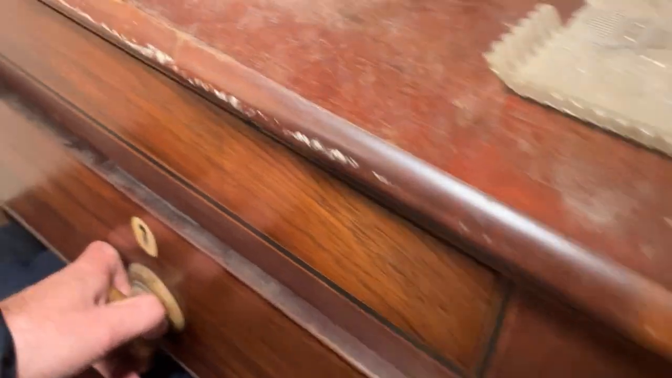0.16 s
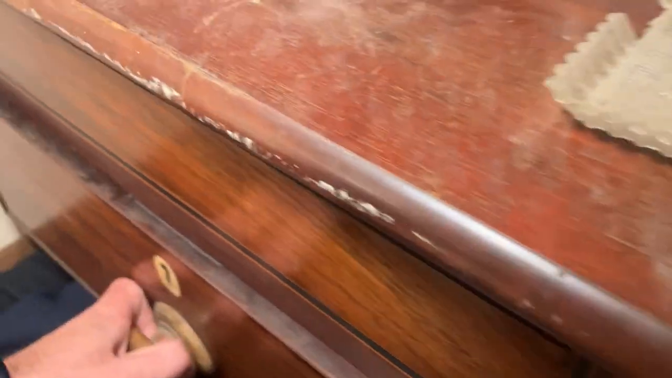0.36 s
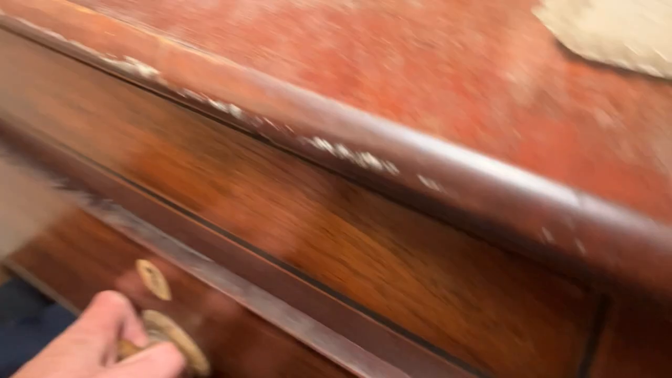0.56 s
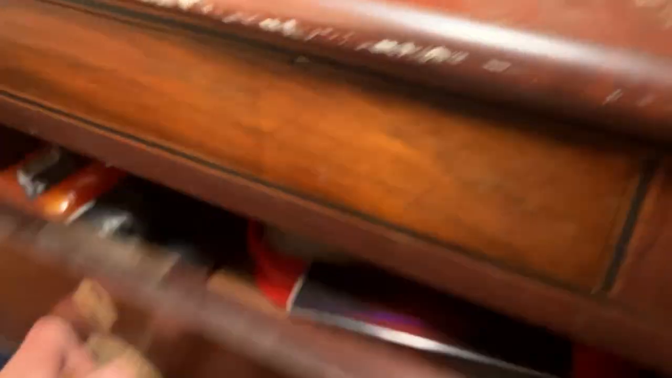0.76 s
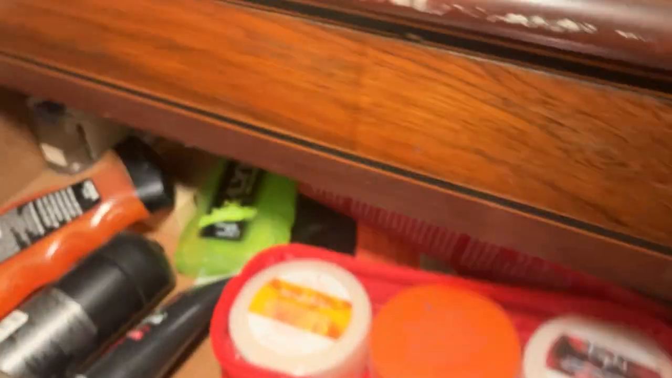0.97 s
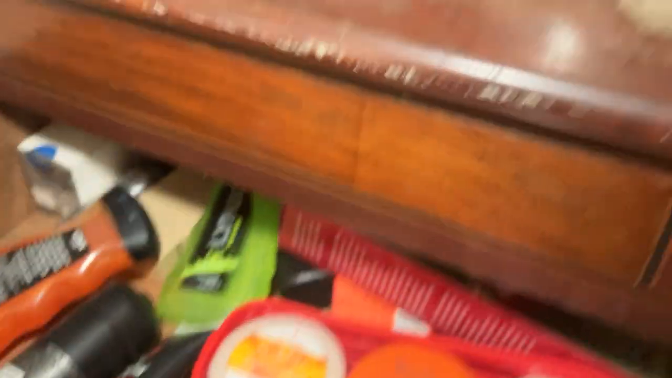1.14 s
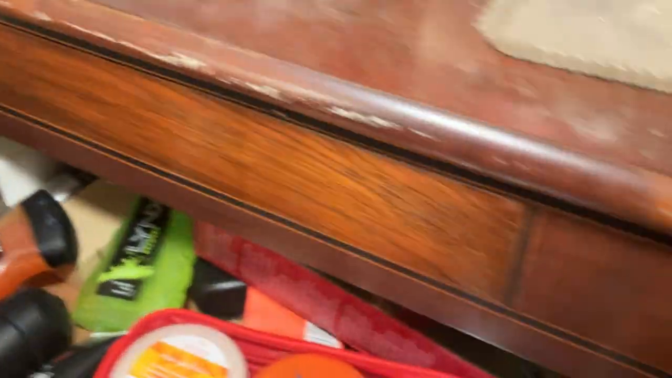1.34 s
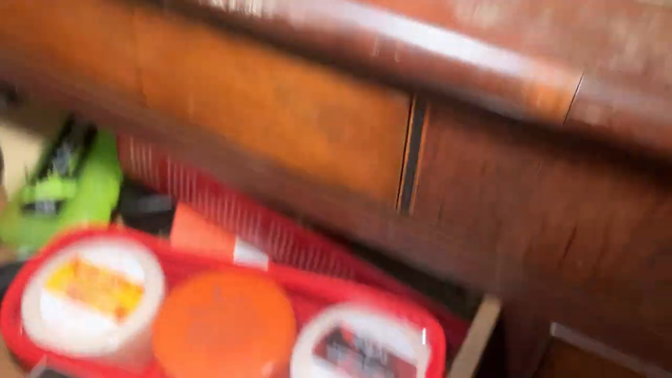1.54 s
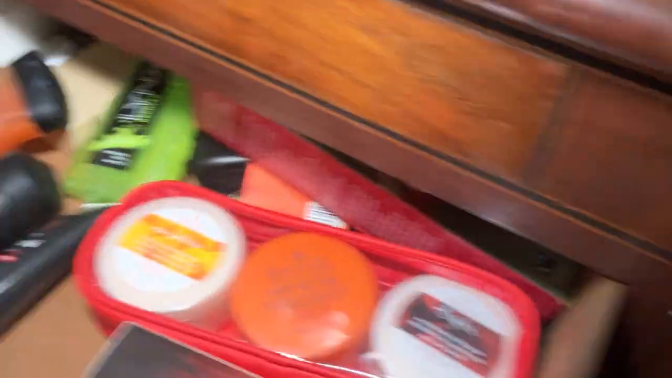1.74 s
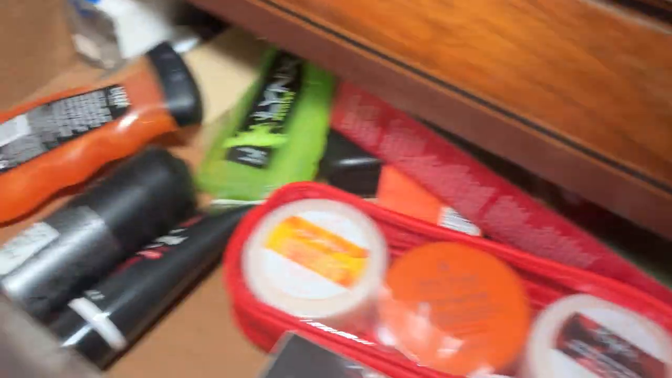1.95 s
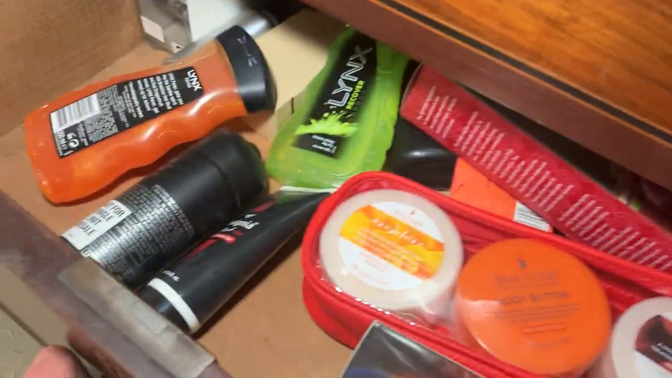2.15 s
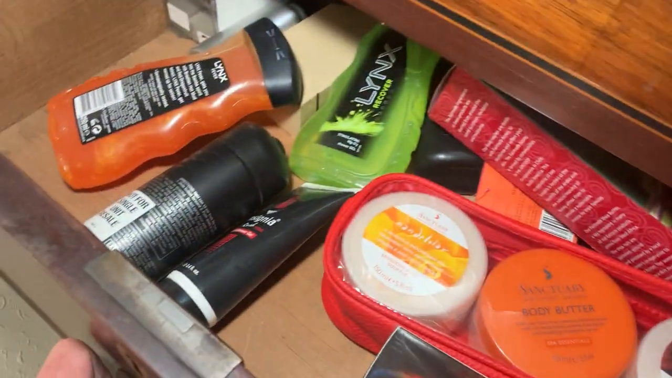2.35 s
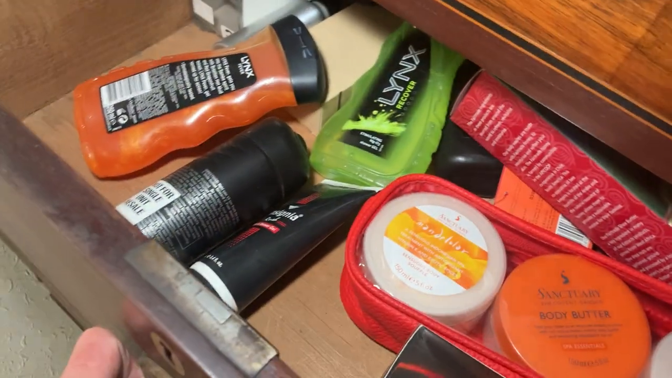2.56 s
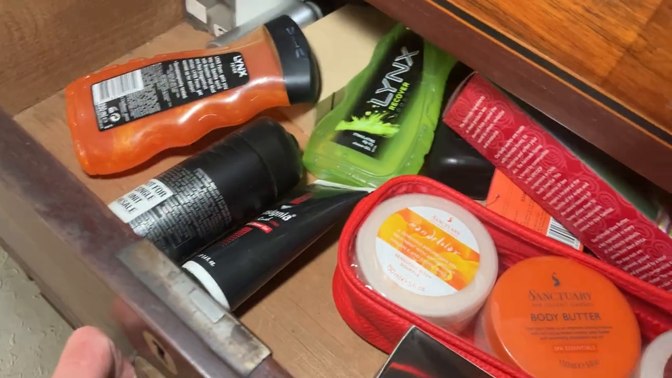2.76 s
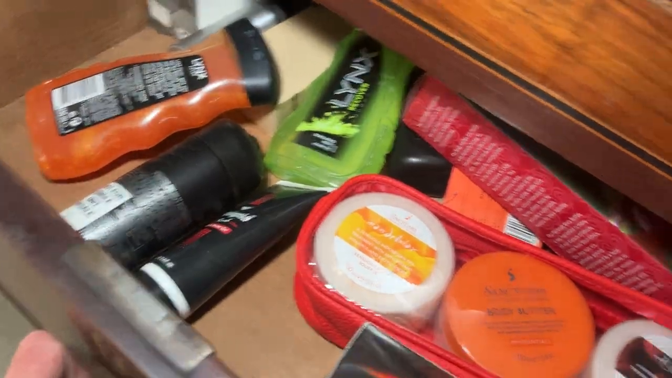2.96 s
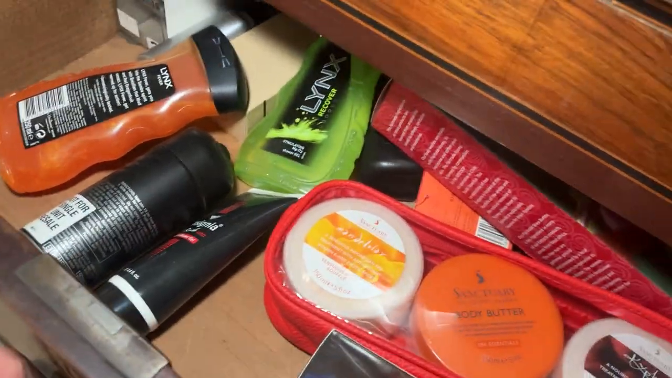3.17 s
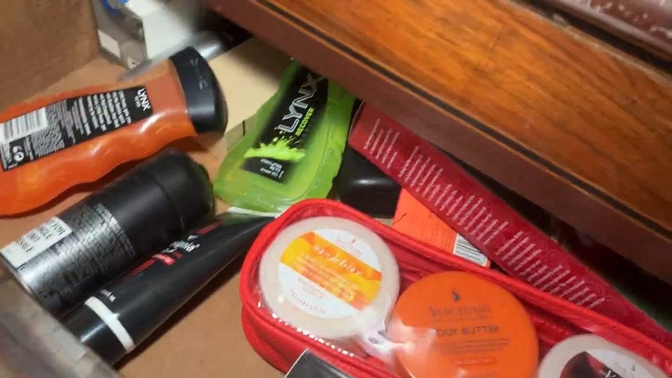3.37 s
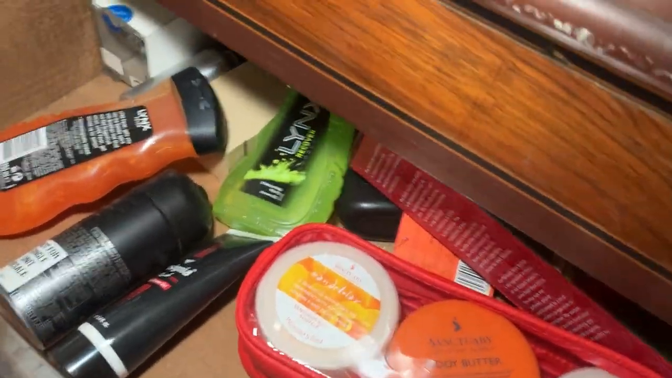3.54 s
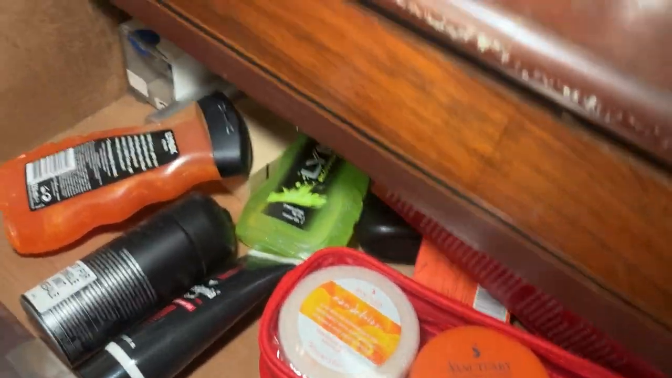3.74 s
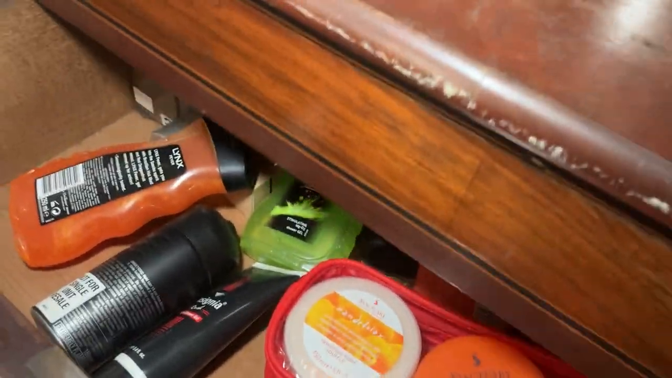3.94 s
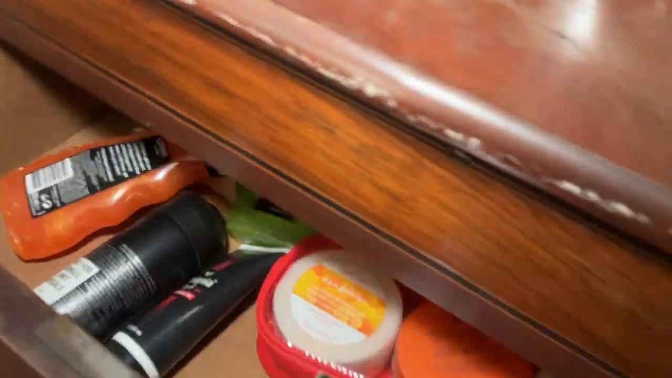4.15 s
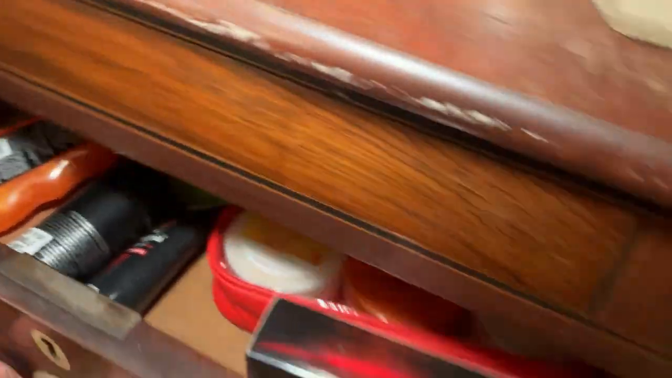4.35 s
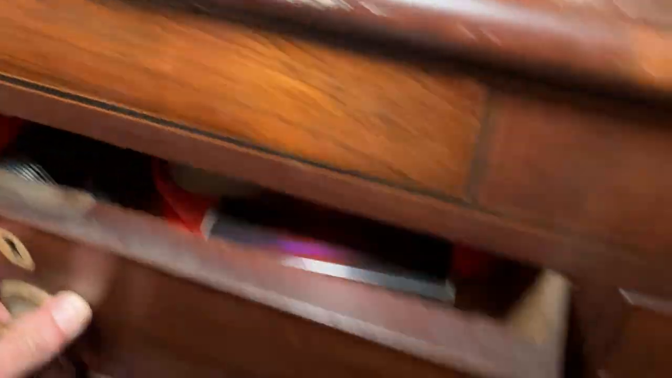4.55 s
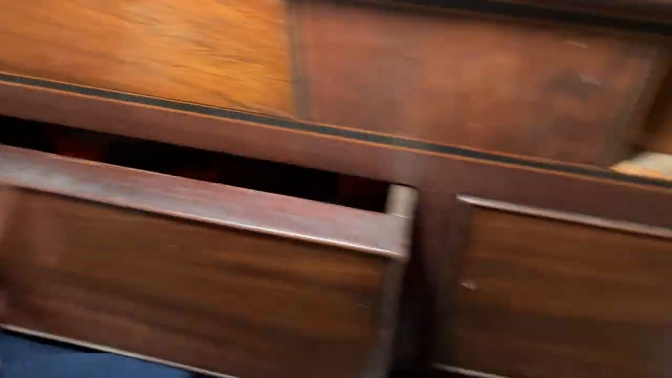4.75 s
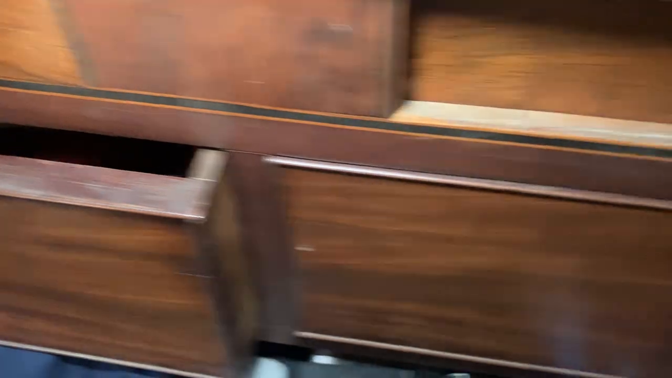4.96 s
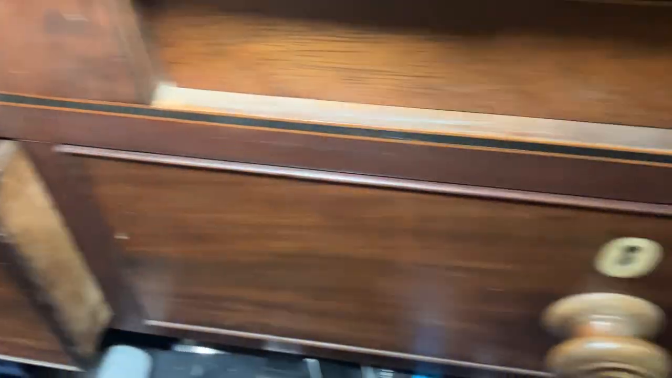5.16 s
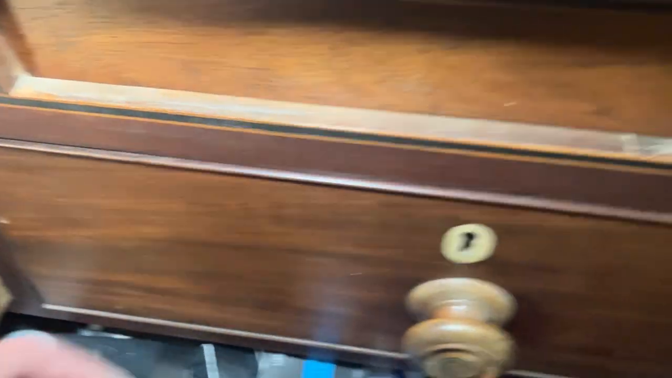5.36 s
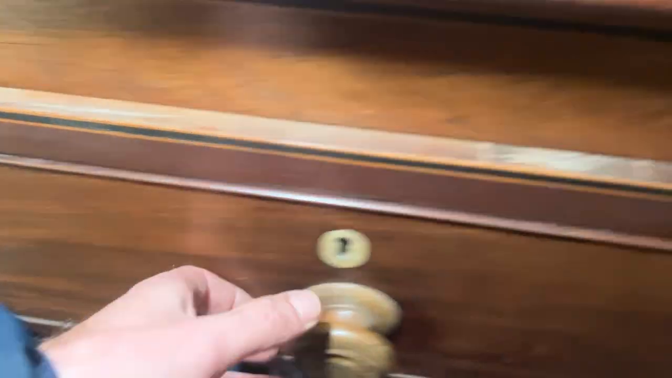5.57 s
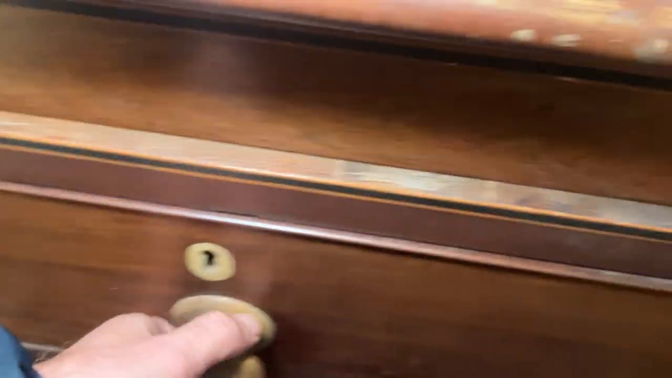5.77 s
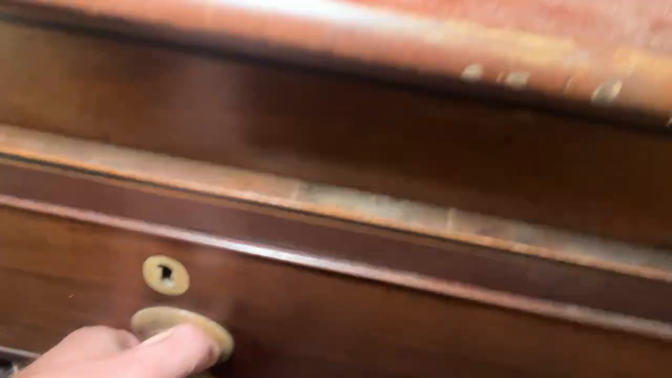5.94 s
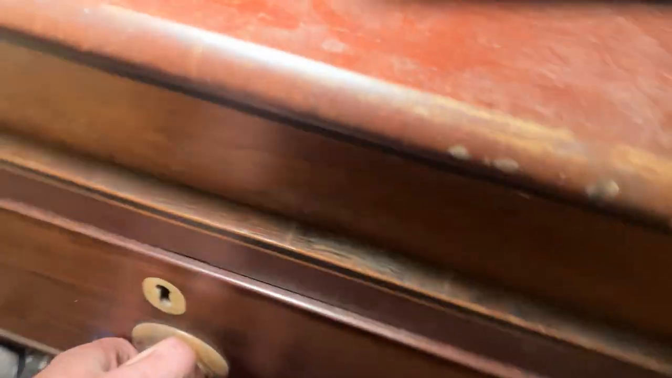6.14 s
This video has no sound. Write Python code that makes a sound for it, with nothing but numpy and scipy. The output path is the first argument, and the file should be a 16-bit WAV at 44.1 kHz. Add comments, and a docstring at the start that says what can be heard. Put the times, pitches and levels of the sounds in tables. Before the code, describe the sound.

Faint taps and skin rubbing, then a sudden dry crack and a dense wooden clatter with low floor shudder as a tight drawer jerks open. A smaller knock ends it. After a hushed pause come light scraping, tiny squeaks, a soft bump and sleeve rustle as it slides partly back, then quiet fumbling at another knob. Short, dull indoor echo, faint room tone, close handheld stereo pickup.

```python
"""A stiff wooden drawer is tugged out of an old chest: it cracks free, jolts along its runners and stops.
Later it is pushed most of the way back and the hand moves on to the next knob; sleeves rustle close by.
Juddering pushes ring the panels, noise bursts make the cracks, tiny slips make the drag and the rustle,
wavering tones squeak and whistle, low noise shudders the floorboards, filtered noise is the quiet room tone.
Feedback delays add the room; a handheld pair of small microphones picks it all up."""
import sys
import numpy as np
from scipy import signal
from scipy.fft import rfft, irfft, next_fast_len
from scipy.io import wavfile

SR = 44100
rng = np.random.default_rng(int(sys.argv[2]) if len(sys.argv) > 2 else 0)


def pcm_store(signal):
    """Save signal as 16-bit PCM."""
    levels = np.round(np.clip(np.atleast_2d(signal), -1, 1) * 32767)
    wavfile.write(sys.argv[1], SR, levels.astype(np.int16).T)


N = 273578

# dull blows and judders in the carcass: start_s, level_db, pitch_hz (of the judder), push_cycles
KNOCKS = [(0.058, -42, 555, 3.7), (0.065, -37, 200, 2.5), (0.083, -36, 205, 4.7), (0.13, -42.5, 144, 3.4),
          (0.423, -43, 150, 2.3), (0.49, -39.5, 237, 1.4), (0.518, -41, 172, 2.4), (0.585, -33.5, 450.4, 3),
          (0.591, -32, 894, 6.6), (0.694, -8.5, 970, 4.2), (0.699, -19, 270, 2.7), (0.705, -7, 810, 5),
          (0.724, -16, 113, 1.3), (0.73, -21, 560, 6), (0.74, -15, 147.7, 1.2), (0.748, -18.5, 610, 4.2),
          (0.769, -7, 139, 1.3), (0.777, -11, 336, 9), (0.768, -6, 674, 1), (0.787, -16, 104, 3.1),
          (0.789, -17, 516, 5.8), (0.808, -8.5, 239, 2), (0.812, -12.5, 359.4, 8), (0.822, -0.5, 160, 2.5),
          (0.836, -11.5, 300, 5), (0.85, -11.5, 188, 2), (0.852, -20, 565, 4), (0.87, -37.5, 106, 1.4),
          (0.917, -13.5, 155, 1.7), (0.925, -13.5, 205, 2), (0.94, -20.5, 153, 6.9), (0.943, -25, 505, 5.1),
          (1.152, -28, 243, 5.2), (1.191, -15.5, 248, 2.4), (1.196, -17, 316, 6), (1.228, -25, 142.7, 1.8),
          (1.966, -43, 156, 1.6), (2.053, -48, 131, 2.9), (2.075, -42, 126, 3.2), (2.1, -37.5, 175, 5.7),
          (2.127, -45.5, 206.5, 6.9), (2.155, -49, 218, 2.2), (2.181, -42.5, 122.4, 5.1),
          (3.058, -47, 200, 0.81), (3.089, -45.5, 100, 2), (3.06, -51.5, 546, 4), (3.206, -52, 875, 4),
          (3.483, -40, 344, 3), (3.491, -42.5, 175, 3), (3.529, -51, 103, 3.3), (3.671, -33.5, 243, 5.2),
          (3.673, -37, 457, 12), (3.718, -45, 567, 9), (3.79, -39, 443, 9), (4.062, -33, 365, 9.8),
          (4.074, -24, 139, 8.2), (4.103, -41, 102, 2), (4.164, -35, 132, 3.1), (4.272, -43, 374, 9),
          (4.33, -45, 374, 9), (4.694, -37.5, 610, 1.6), (4.702, -36, 354, 8.6), (4.705, -30.5, 152, 2.4),
          (4.729, -34.5, 116, 2.4), (4.922, -44.5, 594, 5.9), (4.923, -46.5, 1410, 5.7),
          (5.554, -41.5, 560, 4), (5.557, -39.5, 162, 3.9), (5.58, -40, 172, 7.4), (5.606, -44, 191, 7),
          (5.815, -37.5, 181, 6.6), (5.865, -40.5, 179, 7.6), (5.919, -46.5, 185, 3.6),
          (6.006, -41, 152.3, 3.3), (6.058, -41.5, 228.6, 3.1), (6.114, -41.5, 174, 3.3),
          (6.161, -39.5, 141, 2.8)]
# dry cracks of varnish and knob: start_s, level_db, centre_hz, treble_db (relative), left_minus_right_db, t60_s
CRACKS = [(0.036, -30.5, 2540, -13, 2, 0.029), (0.058, -40.5, 1110, -10, 5, 0.053),
          (0.4, -50, 1690, 26.5, 12, 0.024), (0.421, -46, 830, 10, 0, 0.034),
          (0.488, -46.5, 900, -2, -1, .02), (0.585, -32.5, 940, -12, -3, 0.061),
          (0.596, -34, 820, -9, 1, 0.051), (0.615, -34.5, 1500, 30.5, -4, 0.015),
          (0.639, -23, 2830, 26, 2, 0.019), (0.693, -3.5, 2400, 17.5, -2, 0.024),
          (0.702, -4.5, 2200, 20, 0.5, 0.025), (0.711, -17, 1600, 7, 0, 0.041),
          (0.744, -21, 1400, -4.5, -5, .05), (0.757, -12, 1200, -5, -3, 0.071),
          (0.765, -15, 2822, 10, -2.5, 0.072), (0.784, -25, 1400, -5, -3, 0.063),
          (0.812, -14.5, 1499, 16, 3, .04), (0.821, -20, 1703, 3, -6, 0.035),
          (0.835, -24, 1000, 5, -1, .04), (0.849, -30, 1006, 0, -3, 0.044),
          (0.861, -29, 1600, 5, -3, 0.046), (0.905, -29, 1100, 2, -7, 0.049),
          (0.922, -31, 1200, 12, -6, .04), (0.946, -37.5, 1810, 0, -3, 0.031),
          (2.302, -51.5, 758, 6, -1.5, 0.033), (3.053, -48.5, 1500, 6, 0, 0.12),
          (3.203, -46.5, 1980, 3, 1, .05), (4.064, -37, 1200, 5, -2, 0.069), (4.16, -42, 2000, 0, -7, .08),
          (4.435, -39.5, 2200, 8, -5, 0.055), (4.52, -48, 1800, 0, -3, 0.046),
          (4.689, -40.5, 1600, -15, -3, 0.061), (4.696, -38.5, 1400, -16, -3, 0.044),
          (4.921, -43, 1420, 24, -4, 0.03), (5.552, -40, 1200, 20, 11, .025),
          (6.055, -53, 900, -2.5, 1, 0.043), (6.084, -48, 1510, 28.5, 2.5, .012)]
# drag of drawer and hand on the wood: time_s, thin_panels_db, big_panels_db, small_panels_db
DRAG = [(0.0, -55.5, -44, -59), (0.14, -62, -61, -61), (0.33, -66, -58, -68), (0.42, -61, -79, -61),
        (0.56, -66, -54, -67.5), (0.6, -49, -55, -63), (0.68, -52.5, -49, -59), (0.71, -26, -23.5, -42.5),
        (0.75, -23, -24, -33.5), (0.79, -27.5, -15.5, -29.5), (0.825, -23, -23, -23.5),
        (0.87, -36.5, -44, -29.5), (0.9, -38.5, -25, -31.5), (0.93, -37, -38.5, -31.5),
        (0.98, -41.5, -38, -37.5), (1.06, -50.5, -47, -49), (1.15, -50, -52, -65), (1.21, -44, -42, -61),
        (1.3, -78, -43.5, -66), (1.5, -69, -81.5, -73.5), (1.86, -73, -69, -68), (1.96, -62, -57.5, -62),
        (2.1, -62.5, -48, -64), (2.2, -65, -54, -68), (2.28, -71, -76.5, -80), (2.65, -72, -64, -71.5),
        (3.0, -69, -78, -78), (3.08, -81, -70, -61), (3.35, -67.5, -82, -79), (3.52, -54, -61, -56.5),
        (3.64, -60, -60, -66), (3.7, -51.5, -53, -47.5), (3.79, -51, -47, -53), (3.96, -57, -66, -58.5),
        (4.04, -57, -55.5, -64), (4.09, -48, -44, -45.5), (4.17, -52.5, -42, -52),
        (4.28, -52.5, -53, -57.5), (4.45, -50.5, -50, -51), (4.63, -54, -56, -62),
        (4.73, -58.5, -42.5, -57), (4.88, -65, -57.5, -60.5), (5.15, -64, -67.5, -63),
        (5.46, -65, -67, -71.5), (5.55, -60, -68, -62), (5.75, -61.5, -62.5, -67.5),
        (5.86, -62.5, -55.5, -59), (6.02, -71.5, -54, -73), (6.2, -62, -65, -61)]
# squeaks of wood, and two faint, thin high whistles: start_s, level_db, pitch_hz, length_s
SQUEAKS_AND_WHISTLES = [(0.811, -20.5, 1732, 0.014), (2.024, -70.5, 4390, 0.25), (2.614, -72.5, 4750, 0.16),
                        (3.82, -58, 1480, 0.11), (3.85, -57.5, 2330, 0.12), (4.048, -49.5, 940, 0.047),
                        (4.15, -52, 1950, .05), (4.15, -55, 3000, 0.037), (4.28, -58, 2050, 0.065),
                        (4.33, -51, 1650, .04), (4.42, -55, 3150, 0.045), (4.46, -57, 2320, .1),
                        (4.49, -59, 3900, .05), (4.144, -41.5, 967, 0.058), (4.233, -55, 938, 0.11),
                        (5.406, -53, 1110, 0.034), (5.619, -57.5, 960, 0.024)]
# hiss of runners, sleeve and skin: time_s, middle_db, treble_db
RUBBING = [(0.0, -58, -61), (.1, -59, -55.5), (.21, -65, -64.5), (.28, -56, -60), (.4, -66, -63.5),
           (.52, -65, -67), (.67, -61, -52), (.69, -39, -60.5), (.715, -30.5, -38), (.77, -39, -30),
           (.79, -42.5, -34), (.82, -35, -30), (.855, -43, -41.5), (.92, -47, -36.5), (.97, -46, -40.5),
           (1.03, -47, -46), (1.22, -50, -48), (1.36, -59, -58), (1.5, -59, -61.5), (1.68, -61.5, -60.5),
           (1.74, -51.5, -53), (1.83, -53.5, -51), (1.9, -50, -52.5), (1.96, -60, -57.5),
           (2.16, -63, -59.5), (2.33, -78, -80), (2.5, -71, -68), (2.75, -70, -67.5), (2.9, -64.5, -63.5),
           (3.05, -64, -61.5), (3.19, -70, -70), (3.36, -57, -56.5), (3.6, -60, -58), (3.7, -57, -54),
           (4.02, -56.5, -52), (4.14, -50.5, -49.5), (4.38, -55, -51.5), (4.46, -50.5, -49.5),
           (4.65, -52, -52), (4.75, -59, -62), (4.85, -60, -65.5), (5.0, -62.5, -59.5),
           (5.06, -60.5, -60.5), (5.29, -58.5, -55.5), (5.42, -47.5, -44), (5.5, -54, -49),
           (5.61, -62, -57.5), (5.7, -60.5, -53), (5.8, -63.5, -60.5), (5.94, -61.5, -54), (6.03, -79, -69),
           (6.1, -67.5, -65.5), (6.14, -65.5, -61.5), (6.2, -59, -57)]
# weight shifts that make the floorboards shudder: start_s, level_db, hold_s
SHUDDERS = [(0.014, -52, 0.13), (0.254, -58, 0.021), (0.467, -57, 0.058), (0.733, -27, 0.11),
            (0.87, -28.5, 0.042), (0.976, -36.5, 0.19), (1.277, -40, .02), (1.39, -50.5, 0.019),
            (1.538, -56.5, 0.016), (1.737, -59.5, 0.036), (1.993, -57, .02), (2.119, -50, 0.058),
            (2.421, -67.5, 0.017), (3.078, -53.5, 0.013), (3.149, -56.5, 0.02), (3.505, -53, .03),
            (3.7, -66, .1), (4.09, -34, 0.046), (4.266, -42.5, 0.02), (4.385, -42, 0.037),
            (4.718, -36.5, 0.054), (4.811, -49, 0.054), (5.59, -72, .02), (5.838, -58, 0.036),
            (6.172, -55, 0.034)]
# panels of the chest, big to thin, ringing freely: pitch_hz, level_db, t60_s
PANEL_MODES = [(140, -1, 0.16), (157.5, -2.5, 0.17), (180, -2.5, 0.13), (198.6, -5.5, 0.14),
               (227, 2.5, 0.065), (292.6, 0, 0.086), (364.5, -0.5, 0.088), (431, -4.5, 0.088),
               (478.2, -2.5, 0.067), (578, -0.5, 0.046), (685, -4, 0.053), (788, 0.5, 0.031),
               (953, 2.5, 0.026), (1113, -0.5, 0.036), (1262, -1, 0.035), (1428, -1.5, 0.034),
               (1710, 0, 0.026), (1945, 2.5, 0.012), (2360, -1.5, 0.02), (2820, -5, 0.02),
               (3010, -11, 0.013), (4240, -7.5, 0.0079)]
# floorboards under the chest: pitch_hz, level_db, t60_s
FLOOR_MODES = [(45, -6.5, 0.16), (61, -2.5, 0.19), (78.7, -5, 0.11)]
# relative spectrum of the rubbing hiss: frequency_hz, level_db (per Hz)
HISS_SPECTRUM = [(300, -18.5), (1000, -6.5), (2500, -7), (4500, -6), (5800, -8.5), (7500, -6), (10000, -6),
                 (13000, -9), (15500, -16.5)]
# edges between the parts of the hiss that wax and wane on their own: frequency_hz
PATCH_EDGES_HZ = (900, 1500, 2430, 3795, 6030, 8200, 11400)
# relative spectrum of the room tone: frequency_hz, level_db (per Hz)
AIR_SPECTRUM = [(30, -11), (100, -4.5), (400, -11), (1000, -23), (3000, -24), (5000, -17), (9000, -25.5),
                (15000, -34.5)]
# how alike left and right are: frequency_hz, likeness (0 to 1)
LIKENESS = [(60, 0.96), (200, 0.95), (300, 0.84), (470, 0.7), (760, 0.35), (1200, 0.45), (2000, .1),
            (6000, 0.05)]
# balance of the two microphone ports: frequency_hz, left_minus_right_db
PORT_BALANCE = [(60, 1.54), (200, 1), (400, 0), (1300, -0.5), (2400, -2), (4400, -0.5)]

FREE_RING, FREE_GROWTH = 0.34, 0.49   # share of free ring time for a 150 Hz judder; higher ones are damped less
CRACK_RISE = 0.015   # rise time as a share of the decay time
WANDER_HZ = 8   # how fast the rubbing contact moves between modes
CATCH_DB, HISS_FLICKER_DB, PATCH_DB = 1.2, 0.6, 1.2   # spreads of the slow random level changes
HISS_SPLIT_HZ = 6200   # between middle and treble of the hiss
RUB_LIKENESS, RUB_LAG_S = 0.17, 0.0003   # rubbing comes from the left: least likeness, delay of the right
SHUDDER_RISE_DB_PER_S, SHUDDER_FALL_DB_PER_S, FLOOR_REST_DB = 593.5, 189, -67.5
AIR_DB = -67
ROOM_T60_S, ROOM_DB, WALL_CUT_HZ = 0.24, -13, 6100
SHARED_ABOVE_HZ = 6600   # above this both channels carry the same treble
LAG_S, IN_STEP_HZ = 0.000303, 8100   # delay of the shared treble; where it stays in phase
BASS_CUT_HZ, CUTOFF_HZ = 39, 16200


def knocks():
    """A push that judders a few cycles drives the panels near its pitch; hand and contents damp the ring."""
    out = np.zeros((2, N))
    chance = rng.standard_normal((len(KNOCKS), 2, len(PANEL_MODES)))
    t = np.arange(SR // 8) / SR
    for (start_s, level_db, judder_hz, cycles), luck in zip(KNOCKS, chance):
        free = np.clip(FREE_RING * (judder_hz / 150) ** FREE_GROWTH, 0.05, 1)
        rise = np.clip(cycles, 0.7, 8) / judder_hz / 6.7
        push = np.sin(2 * np.pi * judder_hz * t) * t / rise * np.exp(-t / rise)
        blow = 0
        for k, (hz, db, t60) in enumerate(PANEL_MODES):
            if hz > 3 * judder_hz:   # too stiff to follow the push
                break
            signs = [[(-1) ** k], [np.sign(luck[0, k])]]
            sides = from_db(db + 3.9 * luck[:, [k]]) * signs
            blow = blow + sides * ring(push, hz, free * t60)
        blow = blow / np.abs(blow).max(axis=1, keepdims=True)
        i = round(start_s * SR)
        out[:, i:i + len(t)] += (from_db(level_db) * blow)[:, :N - i]
    return out


def cracks():
    """A few milliseconds of dying noise; its middle part rings the thin panels near its centre."""
    out, t = np.zeros((2, N)), np.arange(SR // 10) / SR
    treble = signal.butter(2, 2300, "high", fs=SR, output="sos")
    for start_s, level_db, centre_hz, treble_db, pan_db, t60 in CRACKS:
        common, left, right = rng.standard_normal((3, len(t)))
        rise = 1 - np.exp(-t / (CRACK_RISE * t60))
        decay = from_db(-60 * t / np.clip(t60, 0.005, 0.12))
        snap = (0.64 * common + 0.5 * np.array([left, right])) * rise * decay
        band = signal.butter(3, [centre_hz / 5.6, centre_hz * 1.48], "band", fs=SR, output="sos")
        middle = signal.sosfilt(band, snap)
        woody = sum(from_db(db) * ring(middle, hz, 0.5 * free_t60) * (-1) ** k
                    for k, (hz, db, free_t60) in enumerate(PANEL_MODES[8:]))
        burst = middle / np.abs(middle).max() + 0.09 * woody / np.abs(woody).max()
        burst = burst + from_db(treble_db - 25.5) * signal.sosfilt(treble, snap)
        sides = from_db(level_db + pan_db / 2 * np.array([[1], [-1]]))
        i = round(start_s * SR)
        out[:, i:i + len(t)] += (sides * burst)[:, :N - i]
    return out


def slide():
    """Slips along the runners shake the big and small panels."""
    _, big_db, small_db = in_time(DRAG)
    slips = soften(grains(per_s=450, uneven_db=1.5), 700)
    big = panels(slips, PANEL_MODES[:4], wander_db=4.0)
    small = panels(slips, PANEL_MODES[4:8], wander_db=1.5)
    return from_db(big_db) * big + from_db(small_db + 2.6 * drift(22)) * small


def squeaks_and_whistles():
    """A wavering tone that swells and fades; long ones break up."""
    out, waver, broken = np.zeros(N), drift(60), drift(25)
    for start_s, level_db, hz, length in SQUEAKS_AND_WHISTLES:
        i, t = round(start_s * SR), np.arange(round(length * SR)) / SR
        during = slice(i, i + len(t))
        rough = min(length / 0.1, 2)
        swell = np.sin(np.pi * t / length) ** 2 * from_db(2 * rough * broken[during])
        tone = np.sin(2 * np.pi * hz * t + (0.7 + rough) * waver[during])
        out[during] += from_db(level_db) * swell * tone
    return out * from_db([[-1.5], [1.5]])   # a little to the right


def scrape():
    """Grit under the runners rings the thin panels."""
    scrape_db = in_time(DRAG)[0]
    grit = soften(grains(per_s=2500, uneven_db=2.0), 1900)
    return from_db(scrape_db + CATCH_DB * drift(44)) * panels(grit, PANEL_MODES[8:], wander_db=3.5)


def rustle():
    """Dense fibre slips hiss, with middle and treble moving separately."""
    middle_db, treble_db = in_time(RUBBING)
    hiss = patchy(coloured(grains(per_s=3100, uneven_db=-0.4), HISS_SPECTRUM))
    dull = soften(hiss, HISS_SPLIT_HZ)
    both = from_db(middle_db) * rms_one(dull) + from_db(treble_db) * rms_one(hiss - dull)
    return from_db(HISS_FLICKER_DB * drift(7.8)) * both


def floorboards():
    """Low noise rings the boards under each shift of weight."""
    force = soften(rng.standard_normal((2, N)), 99)
    return from_db(shudder_db()) * panels(force, FLOOR_MODES, wander_db=4.0)


def shudder_db():
    """Each shift of weight rises fast, holds and fades; the loudest counts."""
    t = np.arange(N) / SR
    levels = []
    for start_s, level_db, hold_s in SHUDDERS:
        before, after = np.maximum(start_s - t, 0), np.maximum(t - start_s - hold_s, 0)
        levels.append(level_db - SHUDDER_RISE_DB_PER_S * before - SHUDDER_FALL_DB_PER_S * after)
    return np.maximum(np.max(levels, axis=0), FLOOR_REST_DB)


def room(x):
    """Four feedback delays a side, duller on every round."""
    size = next_fast_len(N + SR)
    hz = np.arange(size // 2 + 1) * SR / size
    echoes = np.zeros((2, len(hz)), complex)
    for k, lag in enumerate(rng.uniform(0.019, 0.04, 8)):
        loss = from_db(-60 * lag / ROOM_T60_S) / (1 + 1j * hz / WALL_CUT_HZ)
        loop = loss * np.exp(-2j * np.pi * hz * lag)
        echoes[k % 2] += loop / (1 - loop) * (-1) ** (k // 2)
    return irfft(echoes * rfft(x, size), size)[:, :N]


def room_tone():
    """Steady noise shaped to the spectrum of a quiet room."""
    return from_db(AIR_DB) * coloured(rng.standard_normal((2, N)), AIR_SPECTRUM)


def panels(force, modes, wander_db):
    """Modes driven by a force; the moving contact favours now one, now another; rms 1."""
    return rms_one(sum(from_db(db + wander_db * drift(WANDER_HZ)) * ring(force, hz, t60) * (-1) ** k
                       for k, (hz, db, t60) in enumerate(modes)))


def grains(per_s, uneven_db):
    """Two draws of random slips of uneven size."""
    sizes = from_db(uneven_db * np.minimum(rng.exponential(1, (2, N)), 5))
    signs = rng.choice([-1, 1], (2, N))
    return sizes * signs * (rng.random((2, N)) < per_s / SR)


def ring(x, hz, t60):
    """A unit click sets a decaying sine of starting height 1 ringing."""
    r, w = from_db(-60 / (t60 * SR)), 2 * np.pi * hz / SR
    return signal.lfilter([0, np.sin(w)], [1, -2 * r * np.cos(w), r * r], x + 1e-18)


def soften(x, hz):
    """Two-pole low-pass: a contact that takes time."""
    return signal.sosfilt(signal.butter(2, hz, fs=SR, output="sos"), x)


def patchy(x):
    """Each part of the spectrum swells and thins on its own."""
    lows = [0 * x, *(soften(x, hz) for hz in PATCH_EDGES_HZ), x]
    return sum(from_db(PATCH_DB * drift(21.0)) * (upper - lower) for lower, upper in zip(lows, lows[1:]))


def coloured(pair, spectrum):
    """Two white signals given a spectrum; rms 1."""
    hz = np.arange(N // 2 + 1) * SR / N
    return rms_one(irfft(rfft(pair) * from_db(at_hz(spectrum, hz)), N))


def drift(rate_hz):
    """Slow chance of spread 1: noise through two low-pass poles, worked out every 40 samples."""
    r = np.exp(-80 * np.pi * rate_hz / SR)
    slow = signal.lfilter([1], [1, -2 * r, r * r], rng.standard_normal(N // 40 + 2002))[2000:]
    return np.interp(np.arange(N) / 40, np.arange(len(slow)), rms_one(slow))


def spread(pair, least=0, lag_s=0):
    """Left and right from a common and an unrelated signal, most alike in the bass; the right may lag."""
    hz = np.arange(N // 2 + 1) * SR / N
    alike = np.clip(at_hz(LIKENESS, hz), least, 1)
    common, own = rfft(pair)
    sides = (np.sqrt(1 + alike) * common + np.sqrt(1 - alike) * own * [[1], [-1]]) / np.sqrt(2)
    return irfft(sides * np.exp(-2j * np.pi * hz * lag_s * np.array([[0], [1]])), N)


def in_time(rows):
    """Columns of a curve at every sample."""
    s, *columns = np.transpose(rows)
    return [np.interp(np.arange(N) / SR, s, c) for c in columns]


def at_hz(points, hz):
    """A spectrum read on a log-frequency axis."""
    points_hz, values = np.transpose(points)
    return np.interp(np.log(np.maximum(hz, 1)), np.log(points_hz), values)


def from_db(db):
    """Decibels to gain."""
    return 10 ** (np.asarray(db) / 20)


def rms_one(x):
    """Scaled to rms 1."""
    return x / np.sqrt(np.mean(x ** 2) + 1e-20)


def scene():
    """The drawer and chest, the rubbing, the floor, the room and its tone."""
    hits = spread(knocks()) + cracks() + squeaks_and_whistles()
    drag = slide() + floorboards()
    rubbing = spread(scrape() + rustle() + room_tone(), RUB_LIKENESS, RUB_LAG_S)
    echoes = from_db(ROOM_DB) * room(hits.mean(axis=0))
    return hits + spread(echoes + drag) + rubbing


def record(dry):
    """The left port feeds both trebles, the right one late; bass and top are cut, peaks rounded."""
    hz = np.arange(N // 2 + 1) * SR / N
    left, right = rfft(dry) * from_db(at_hz(PORT_BALANCE, hz) / 2 * [[1], [-1]])
    shared = 1 / (1 + (SHARED_ABOVE_HZ / (hz + 1)) ** 10)
    late = left * np.exp(-2j * np.pi * (hz - IN_STEP_HZ) * LAG_S)
    right = np.sqrt(shared) * late + np.sqrt(1 - shared) * right
    bass_cut = signal.butter(6, BASS_CUT_HZ, "high", fs=SR, output="sos")
    thin = signal.sosfilt(bass_cut, irfft([left, right], N))
    rounded = 1.3 * np.tanh(thin / 1.3)
    return signal.sosfilt(signal.cheby2(16, 80, CUTOFF_HZ, fs=SR, output="sos"), rounded)


dry = scene()
out = record(dry)
pcm_store(out)
```